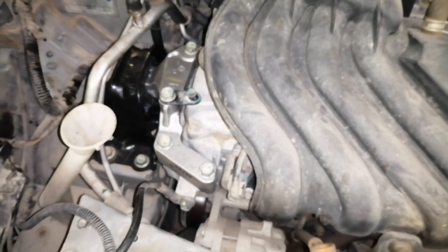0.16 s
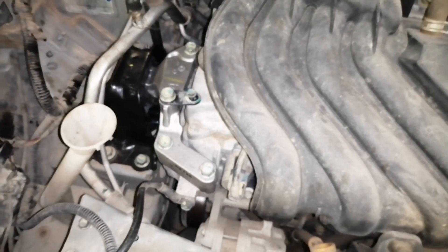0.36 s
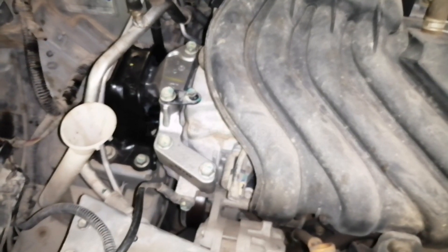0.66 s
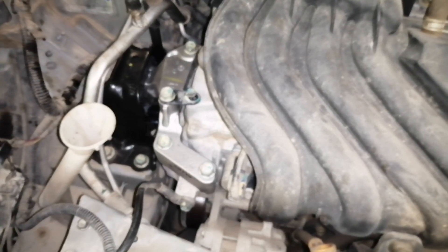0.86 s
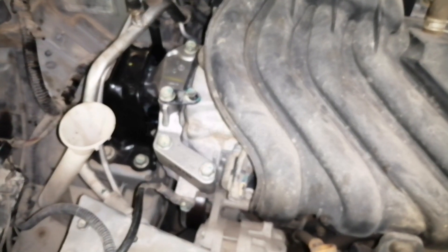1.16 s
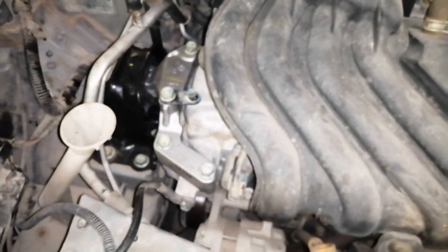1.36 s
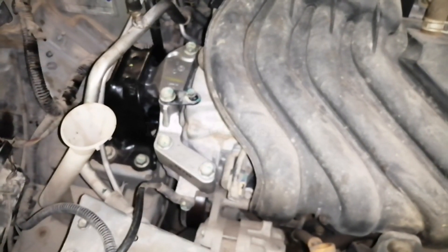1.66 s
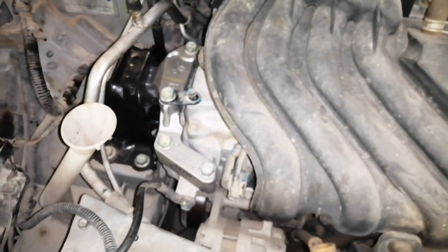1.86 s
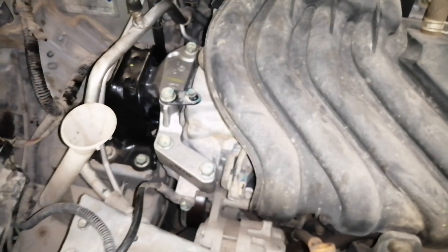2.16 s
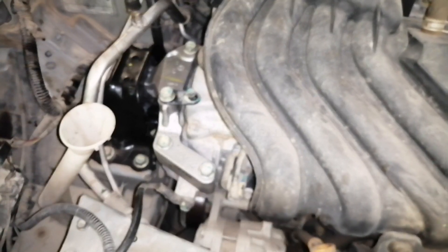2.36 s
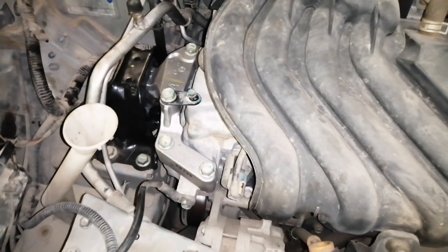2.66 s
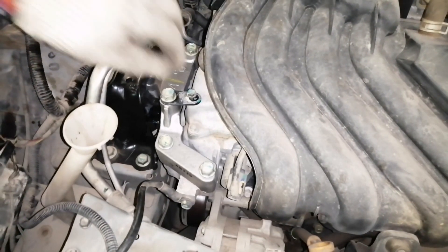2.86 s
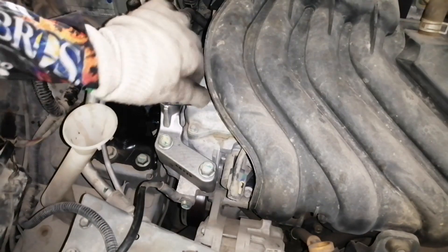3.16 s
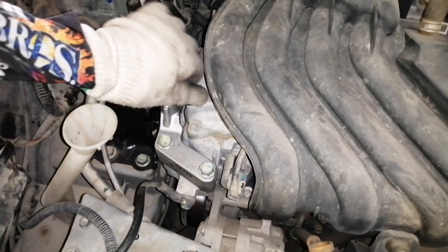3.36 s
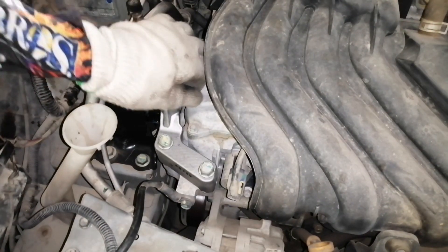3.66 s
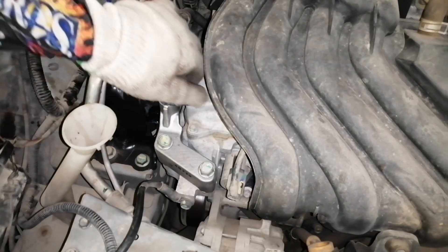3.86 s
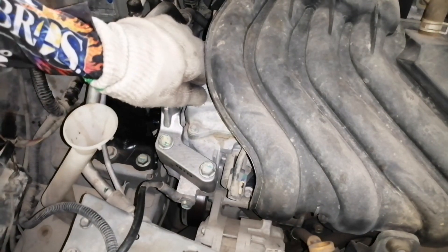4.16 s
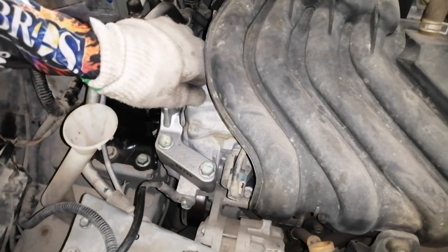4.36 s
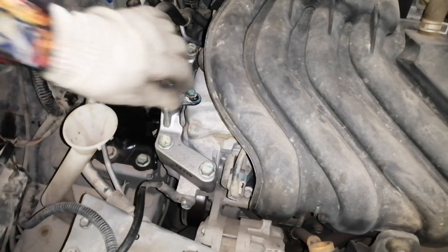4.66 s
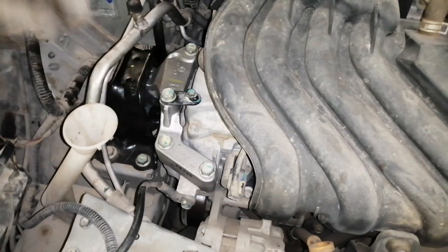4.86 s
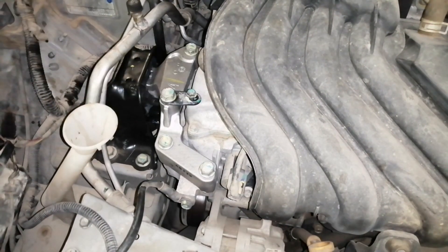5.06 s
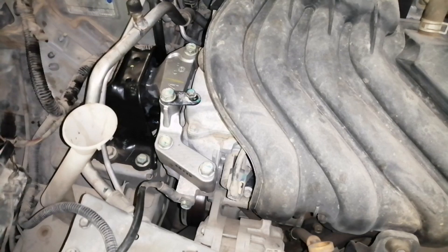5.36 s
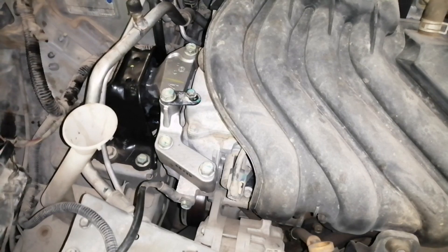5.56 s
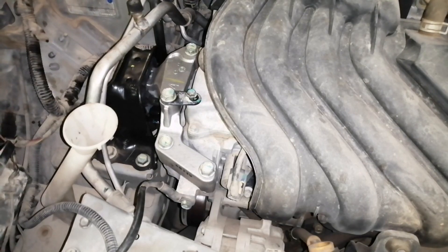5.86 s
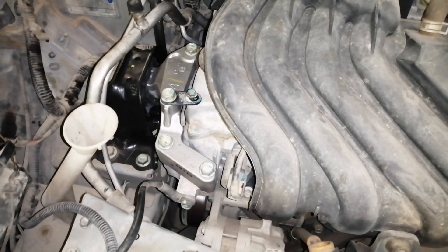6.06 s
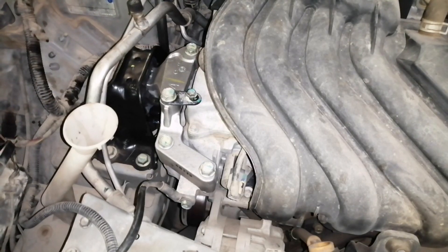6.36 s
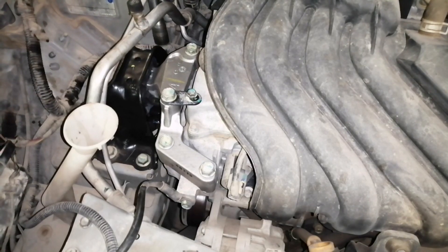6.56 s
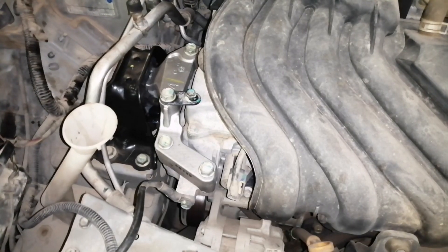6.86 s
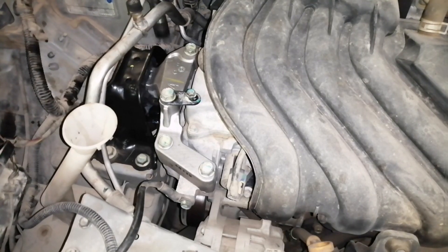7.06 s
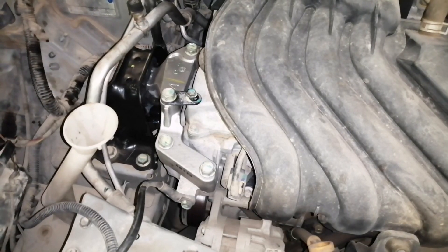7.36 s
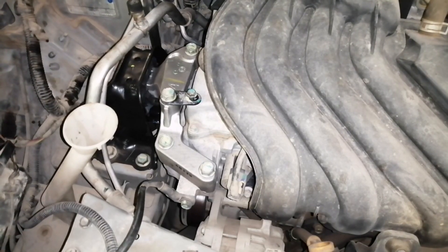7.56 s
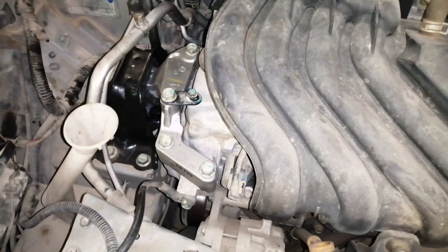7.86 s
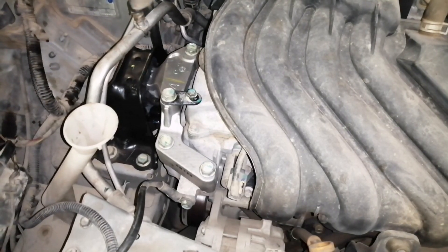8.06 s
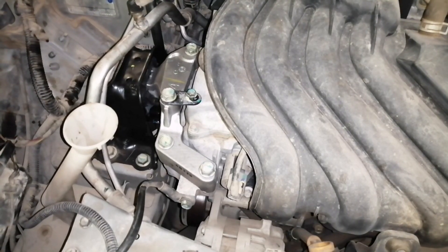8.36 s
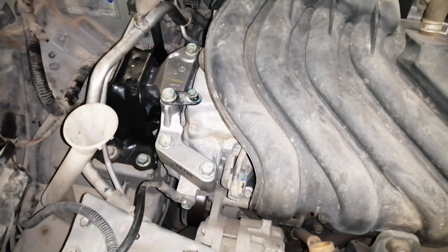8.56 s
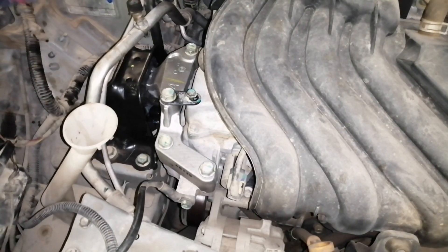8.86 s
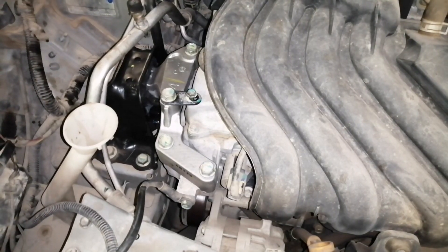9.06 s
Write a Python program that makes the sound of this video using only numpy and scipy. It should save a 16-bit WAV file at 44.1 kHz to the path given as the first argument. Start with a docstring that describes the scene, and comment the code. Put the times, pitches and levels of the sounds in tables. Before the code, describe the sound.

Two quick rattling bursts of a pneumatic ratchet on a bolt, fading hiss of leaking air, then sparse metallic clinks and soft thuds in a workshop.

```python
"""An engine bay in a humming workshop, taken on a two-port microphone: an air ratchet rattles on a bolt.
Two short bursts mix motor hiss, vane pulses and blows that ring engine parts; exhaust buffets the ports.
Then a thin air leak is heard as wavering noise bands, while tools knock and clink as scrapes through resonances.
Soft thuds, light taps and the after-rings of blows and knocks are decaying tones; rumble, a wavering hum
and a dull echo tail lie behind."""
import sys
import numpy as np
from scipy import signal
from scipy.fft import rfft, irfft, next_fast_len
from scipy.io import wavfile

SR = 44100
rng = np.random.default_rng(int(sys.argv[2]) if len(sys.argv) > 2 else 0)


def bounce(signal):
    """Save signal as a 16-bit WAV file at the path given by the first command-line argument."""
    frames = np.transpose(np.atleast_2d(signal))
    limited = np.clip(frames, -1, 1)
    pcm = np.round(limited * 32767).astype(np.int16)
    wavfile.write(sys.argv[1], SR, pcm)


N = 405719
FFT_SIZE = next_fast_len(N)
HZ = np.maximum(np.fft.rfftfreq(FFT_SIZE, 1 / SR), 1)


def from_db(db):
    """Level in dB to amplitude."""
    return 10 ** (np.asarray(db) / 20)


def rms_one(x):
    """Scale to an rms of 1."""
    return x / np.sqrt(np.mean(x ** 2) + 1e-20)


def in_time(rows, outside=None):
    """Draw each column after the time as a line over the whole scene."""
    s, *columns = np.transpose(rows)
    return [np.interp(np.arange(N) / SR, s, c, left=outside, right=outside) for c in columns]


def at_hz(points):
    """Draw (frequency, value) points as a line over log frequency."""
    hz, value = np.array(points).T
    return np.interp(np.log(HZ), np.log(hz), value)


def drift(rate_hz):
    """Slow chance: noise at every 8th sample through a double one-pole low-pass; spread 1."""
    r = np.exp(-16 * np.pi * rate_hz / SR)
    settling = 5000   # samples dropped while the filter settles
    noise = rng.standard_normal(N // 8 + settling + 2)
    slow = signal.lfilter([1], [1, -2 * r, r * r], noise)[settling:]
    return np.interp(np.arange(N) / 8, np.arange(len(slow)), rms_one(slow))


def band(x, low_hz, high_hz):
    """Band-pass with gentle edges."""
    return signal.sosfilt(signal.butter(2, [low_hz, high_hz], "band", fs=SR, output="sos"), x)


def resonate(x, hz, width_hz):
    """One resonance, gain about 1 on top."""
    r = np.exp(-np.pi * width_hz / SR)
    feedback = [1, -2 * r * np.cos(2 * np.pi * hz / SR), r * r]
    return signal.lfilter([(1 - r * r) / 2, 0, (r * r - 1) / 2], feedback, x)


# likeness of the two microphone ports: (frequency [Hz], share of the left noise in the right [0..1])
PORT_LIKENESS = [(60, 0.9), (300, 0.9), (900, 0.7), (2500, 0.08), (15000, 0.083)]


def stereo_noise(spectrum, lag_s, pan_db, least_alike=0):
    """Coloured noise on two spaced ports: the right hears it later and only partly alike; rms 1 before panning."""
    left, other = rfft(rng.standard_normal((2, FFT_SIZE)))
    alike = np.clip(np.maximum(at_hz(PORT_LIKENESS), least_alike), 0, 1)
    delayed = left * np.exp(-2j * np.pi * HZ * lag_s)
    right = alike * delayed + np.sqrt(1 - alike ** 2) * other
    pair = irfft(np.array([left, right]) * from_db(at_hz(spectrum)), FFT_SIZE)[:, :N]
    return rms_one(pair) * from_db([[pan_db / 2], [-pan_db / 2]])


def burst(s, t60, rise_s):
    """First sample of a short sound and its envelope: a rise, then a steepening fall of 60 dB at t60."""
    at = round(s * SR)
    t = np.arange(min(round(.3 * SR), N - at)) / SR
    return at, (1 - np.exp(-t / rise_s)) * from_db(-60 * (t / t60) ** 1.483)


def notes(events, cycles, pan_db, least_s=0):
    """Each row rings one mode that loses 60 dB over the given cycles, or over least_s if longer."""
    out = np.zeros(N)
    for s, level_db, hz in events:
        at, shape = burst(s, max(cycles / hz, least_s), max(.0013, 0.39 / hz))
        ring = np.sin(2 * np.pi * hz * np.arange(len(shape)) / SR)
        out[at:at + len(shape)] -= from_db(level_db) * shape * ring
    return out * from_db([[pan_db / 2], [-pan_db / 2]])


def held(start, end, rise_db_per_s, fall_db_per_s):
    """Level in dB: 0 from start to end, on straight slopes before and after."""
    t = np.arange(N) / SR
    return np.minimum(0, np.minimum(rise_db_per_s * (t - start), fall_db_per_s * (end - t)))


# trigger pulls: (full speed from [s], let go at [s], base level of air and gears [dB])
TRIGGER_PULLS = [(-.1, 0.177, -22.5), (0.404, 1.083, -23.5)]
RISE_DB_PER_S, STOP_DB_PER_S = 480, 750   # the valve opens and shuts


def pulled(fall_db_per_s, lag_s=0):
    """Level in dB of a layer that comes with each trigger pull and dies at its own pace."""
    pulls = [db + held(start + lag_s, end, RISE_DB_PER_S, fall_db_per_s) for start, end, db in TRIGGER_PULLS]
    return np.max(pulls, axis=0)


COAST_DB, COAST_DB_PER_S = -21, 18   # the vanes run down after the valve shuts


def motor_level():
    """Level in dB of the air motor: valve noise, and under it the slower coasting of the vanes."""
    return np.maximum(pulled(STOP_DB_PER_S), COAST_DB + pulled(COAST_DB_PER_S))


# colour of the motor hiss: (frequency [Hz], relative spectrum level [dB])
MOTOR_SPECTRUM = [(59, -31), (100, -28), (524, -10.5), (1250, -7), (1680, -8.5), (3620, -7), (7290, -2),
                  (10700, -11), (15000, -8)]
RATTLE_DB, RATTLE_DB_PER_S = -16, 46   # low rattle relative to the pull's level, and how it dies
RATTLE_LAG_S = 0.031   # the gears take up load after the air is heard


def motor(level_db):
    """Vane motor air hisses; the gears add a low rattle that comes later and dies more slowly."""
    hiss = from_db(level_db + 2.5 * drift(150)) * stereo_noise(MOTOR_SPECTRUM, 0.000241, -1.0, least_alike=0.29)
    rattle_db = RATTLE_DB + pulled(RATTLE_DB_PER_S, RATTLE_LAG_S)
    rattle_spectrum = [(80, -11.5), (200, 1.0), (600, -5.0), (1300, -35), (2500, -26.5)]
    rattle = from_db(rattle_db + 2.7 * drift(82)) * stereo_noise(rattle_spectrum, .0001, 1.0)
    return hiss + rattle


# ratchet blows, and two faint clicks of exhaust slaps (.879, 1.075):
# (time [s], base crack level [dB], base body drive [dB], rise constant [s])
BLOWS_AND_CLICKS = [(0.0587, -15, -22, 0.0032), (0.143, -16.5, -14.5, 0.0045), (.2315, -24, -20, 0.00054),
                    (0.462, -15, -14.5, 0.0027), (0.5255, -16.5, -17, 0.0013), (.594, -14.5, -14, 0.0017),
                    (0.6638, -13.5, -24, 0.00044), (0.727, -15, -16, 0.0004), (0.7894, -16.5, -17.5, .0004),
                    (0.853, -15, -16.5, .0004), (.879, -27, -38, 0.00037), (0.917, -14, -22.5, 0.0022),
                    (0.977, -14, -16.5, 0.00039), (1.0362, -18.5, -17.5, 0.0011), (1.075, -26, -43, .0004),
                    (1.1364, -25, -19, 0.0006), (1.195, -28, -23, 0.0026)]
# colour of the cracks: (frequency [Hz], relative spectrum level [dB])
CRACK_SPECTRUM = [(100, -8), (524, -2), (891, 4), (970, -8), (1310, -4), (1720, 2.5), (3620, -12.5),
                  (5300, 3), (15000, -16)]
# engine parts rung by the ratchet: (frequency [Hz], width [Hz], relative level [dB])
ENGINE_PARTS = [(204, 66, -8.5), (531, 56, -1), (957, 37, -2.5), (1126, 52, -7.5), (1636, 200, -6),
                (2344, 20, -1), (2673, 67, -2.5)]
REBOUND_S, REBOUND_DB = 0.0145, -8.5   # one weaker repeat follows each row, as a pawl bounces; mean delay
HARD_BLOW_DB, DULLING = -18.5, 0.34   # softer rows lose this many dB per octave for each dB
BLOW_T60_S, SNAP_RISE_S = 0.049, 0.00055   # rows that rise more slowly than this snap less
RIGHT_LAG = np.array([0, 11])   # the right port hears the snaps later [samples]


def blows_and_clicks(motor_db):
    """Each blow or click is a snap and a burst of chatter, with one repeat, that rings the engine parts."""
    crack = np.zeros(N)
    # the running motor also shakes the parts faintly
    drives = np.outer(np.ones(len(ENGINE_PARTS)), .15 * from_db(motor_db))
    octaves = np.log2(np.array(ENGINE_PARTS)[:, 0] / ENGINE_PARTS[1][0])
    chatter = from_db(0.98 * drift(310)) * stereo_noise([(20, 0), (20000, 0)], 0.00018, -2.5)
    snaps = np.zeros((2, N))
    for s, crack_db, body_db, rise_s in BLOWS_AND_CLICKS:
        at, shape = burst(s, BLOW_T60_S, rise_s)
        span = slice(at, at + len(shape))
        bounce_s = REBOUND_S * rng.uniform(.8, 1.2)
        shape = shape + from_db(REBOUND_DB) * np.roll(shape, round(bounce_s * SR))
        sharp_front = .8 + 1.2 * burst(s, 0.011, 0.0003)[1]
        crack[span] += from_db(crack_db) * shape * sharp_front
        # no two rows excite the parts alike
        part_db = rng.normal(0, 2.5, len(ENGINE_PARTS)) + DULLING * min(0, crack_db - HARD_BLOW_DB) * octaves
        drives[:, span] += np.outer(from_db(body_db + part_db), shape)
        # the snap comes just after the start
        snaps[[0, 1], round((s + .0012) * SR) + RIGHT_LAG] -= from_db(crack_db + 3.0) * min(1, SNAP_RISE_S / rise_s)
        chatter[[0, 1], round((s + .003) * SR) + RIGHT_LAG] += 14.0
    running = round(1.6 * SR)   # the parts ring only in this opening stretch
    rung = np.zeros((2, N))
    for (hz, width_hz, db), drive in zip(ENGINE_PARTS, drives):
        ring = resonate((drive * chatter)[:, :running], hz, width_hz)
        rung[:, :running] += from_db(db + 14 + 3.15 * drift(28)[:running]) * ring
    cracks = crack * from_db(2.9 * drift(270)) * stereo_noise(CRACK_SPECTRUM, 0.00029, -2.2, least_alike=0.38)
    return cracks + rung + band(snaps, 1300, 8000)


def ratchet():
    """Air motor and gears follow the trigger pulls; blows and clicks ring the engine parts."""
    level_db = motor_level()
    return motor(level_db) + blows_and_clicks(level_db)


# the vane motor growls early on: (time [s], vane rate [Hz], base level [dB])
VANE_GROWL = [(0, 221.2, -33.5), (.058, 296, -30), (.074, 264, -34), (.082, 250, -53)]


def spin_up():
    """Vane pulses: four uneven harmonics in step, a sharp pull each, that follow the vane rate."""
    hz, level_db = in_time(VANE_GROWL)
    turns = 2 * np.pi * np.cumsum(hz) / SR
    sounding = np.arange(N) < VANE_GROWL[-1][0] * SR
    pulses = sum(from_db(1.2 * drift(40)) * np.cos(k * turns) / k ** 0.1 for k in range(1, 5))
    return -from_db(level_db) * sounding * pulses


# exhaust stream on the microphone, mean of both ports: (time [s], level [dB])
EXHAUST_STREAM = [(0, -46), (.17, -43), (.2, -67), (.37, -64), (.6, -33), (.8, -29), (1.05, -33),
                  (1.11, -66)]
# single slaps of exhaust air on the left port: (time [s], level before its decay [dB])
EXHAUST_SLAPS = [(.06, -13.5), (0.73, -13), (.817, -18), (0.858, -7), (.997, -6), (1.022, -10),
                 (1.077, -10)]
SLAP_S, SLAP_RIGHT_DB = 0.0044, -37   # half a swing; right port relative to the left


def buffeting():
    """Exhaust air hits the ports: lumpy low noise, and single slaps that push the membrane in and out."""
    lumps = np.array([from_db(4.8 * drift(34)) * band(rng.standard_normal(N), 25, 345) for port in range(2)])
    out = rms_one(lumps) * from_db(in_time(EXHAUST_STREAM, -120)[0] + [[4.5], [-4.5]])
    t = np.arange(round(5 * SLAP_S * SR)) / SR / SLAP_S   # in half swings
    slap = -np.sin(np.pi * t) * np.exp(-1.5 * t)
    for s, level_db in EXHAUST_SLAPS:
        at = round(s * SR)
        out[:, at:at + len(t)] += from_db(level_db + np.array([[0], [SLAP_RIGHT_DB]])) * slap
    return out


# air flow through the leak: (time [s], base level of the main band [dB])
LEAK_FLOW = [(.17, -50), (.22, -38), (1.68, -36), (1.78, -41), (1.92, -45), (2.45, -46), (2.66, -56),
             (4.4, -57), (4.8, -51.5), (4.87, -47), (5.0, -47.5), (5.1, -43), (5.33, -42), (5.42, -50.5),
             (9.2, -50.5)]
# the jet's low whistling band: (time [s], base level [dB])
LEAK_WHISTLE = [(.17, -45.5), (1.25, -42), (1.5, -47), (2.38, -58.5), (2.52, -55.5), (3.0, -60),
                (4.4, -60.5), (4.84, -53), (4.93, -43), (5.06, -42.5), (5.13, -56)]
# colour of the jet under its resonances: (frequency [Hz], relative spectrum level [dB])
LEAK_SPECTRUM = [(1060, -36), (1800, -8), (3950, -7), (4970, -2), (6650, 0.5), (8060, -3.5), (10900, -5.5),
                 (14900, -5)]
# nozzle resonances: (frequency [Hz], width [Hz], mean added level [dB])
NOZZLE_RESONANCES = [(2930, 1540, 5), (5270, 500, -3.5), (6950, 850, -4), (9920, 1150, -0.5),
                     (15370, 2900, 1.5)]
TOP_DB, TOP_FOLLOWS = -49.5, 1.16   # thin top at a flow of -49.5 dB; it swings more than the flow
PUFF_FROM_S, PUFF_TO_S, PUFF_EDGE_DB_PER_S = 3.026, 3.11, 413   # a jolt lets one puff out; how it fades
PUFF_DB, PUFF_WHISTLE_DB, PUFF_TOP_DB, PUFF_THIN_DB = -41, -46, -40, -46   # the puff in each band


def leak():
    """A thin jet: nozzle resonances waver, the top follows the flow, a lower whistling band swells on its own."""
    puff_db = held(PUFF_FROM_S, PUFF_TO_S, 700, PUFF_EDGE_DB_PER_S)
    flow_db, = in_time(LEAK_FLOW)
    main_db = np.maximum(flow_db, PUFF_DB + puff_db)
    top_db = np.maximum(TOP_DB + TOP_FOLLOWS * (flow_db + 49.5), PUFF_THIN_DB + puff_db)
    whistle_db = np.maximum(in_time(LEAK_WHISTLE)[0], PUFF_WHISTLE_DB + puff_db)
    air = stereo_noise(LEAK_SPECTRUM, 0.00043, -0.98)
    jet = air + sum(from_db(db + 1.8 * drift(2.56)) * resonate(air, hz, width_hz)
                    for hz, width_hz, db in NOZZLE_RESONANCES)
    parts = ((whistle_db, 2000, 3700), (main_db, 4200, 7900), (top_db, 8000, 17000),
             (PUFF_TOP_DB + puff_db, 7900, 11200))
    out = np.zeros((2, N))
    for db, low_hz, high_hz in parts:
        layer = band(band(jet, low_hz, high_hz), low_hz, high_hz)
        out += from_db(db + 1.32 * drift(15)) * rms_one(layer)
    return out


# tools on metal: (time [s], scrape level [dB], ring of the struck part [Hz], ring level [dB],
# pitch where the tool rings most [Hz], tool level [dB], t60 of the contact [s]); levels are base values
TOOL_KNOCKS = [(3.0089, -37, 500, -16, 2460, -35, 0.036), (3.013, -39, 967, -21, 2550, -18.5, 0.059),
               (3.087, -34, 488, -27, 2710, -27, 0.042), (3.0925, -49, 905, -49, 4700, -14, 0.046),
               (5.447, -45, 503, -43, 1700, -43, 0.04), (5.466, -34.5, 476, -64, 3100, -28.5, 0.11),
               (5.831, -42.5, 490, -45, 2600, -46.5, 0.055), (6.041, -36.5, 785, -49, 2340, -23.5, 0.04),
               (6.066, -59, 990, -37, 1810, -27, 0.055), (6.397, -47, 710, -41, 5500, -35, 0.084),
               (6.461, -58, 900, -57, 5300, -30, 0.058), (6.541, -42, 800, -49, 5840, -18.5, 0.065),
               (6.83, -41.5, 787, -36, 6300, -26, 0.12), (7.777, -36, 896, -33.5, 5160, -18, 0.083),
               (7.833, -53, 496, -34.5, 1700, -47, 0.052), (7.86, -35, 487, -57, 4970, -31, 0.048),
               (7.884, -46, 920, -38, 4750, -29, 0.066), (8.112, -40, 854, -38, 5850, -22.5, 0.11),
               (8.134, -50, 515, -36, 4960, -16.5, 0.054), (8.142, -43, 1630, -35, 5360, -28, 0.069),
               (8.17, -55, 899, -28.5, 1600, -39, 0.079), (8.778, -39, 3000, -37, 3200, -24.5, 0.092),
               (8.878, -46, 933, -30, 2100, -41, 0.068), (8.941, -51, 483, -49, 1660, -30, 0.089)]
# hand tool modes: (frequency [Hz], width [Hz], mean relative level [dB])
TOOL_MODES = [(1645, 40, -12), (2630, 140, -17), (3700, 300, -17.5), (4900, 110, -4), (5160, 99, -6),
              (6100, 90, -4)]
KNOCK_RISE_S = 0.0034   # rise of a contact with a t60 of .1 s, far slower in longer ones
TICK_RISE_S = 0.0021   # contacts that rise more slowly than this tick less
TOOL_DB_PER_OCTAVE = 3.5   # modes further from the struck spot's pitch ring less


def knocks():
    """Each contact is a short scrape of noise: it rings the struck part and the tool's own modes."""
    out = np.zeros((2, N))
    scrape_spectrum = [(150, 4.5), (700, 1.5), (8000, -15.5), (16000, -41)]
    grit = from_db(2.14 * drift(490)) * stereo_noise(scrape_spectrum, 0.00036, -6.0, least_alike=0.2)
    for s, scrape_db, part_hz, part_db, spot_hz, tool_db, t60 in TOOL_KNOCKS:
        rise_s = KNOCK_RISE_S * (10 * t60) ** 2.3
        at, shape = burst(s, t60, rise_s)
        span = slice(at, at + len(shape))
        scrape = shape * grit[:, span]
        scrape[[0, 1], [4, 20]] += 7.8 * min(1, TICK_RISE_S / rise_s)   # the first touch is a hard tick
        # the right port hears the part's tone later
        radians_per_hz = (np.arange(len(shape)) / SR - [[0], [.0004]]) * 2 * np.pi
        part = 0.84 * shape * np.sin(part_hz * radians_per_hz) + resonate(scrape, part_hz, 310)
        tool = 0.84 * resonate(scrape, spot_hz, 370)
        # each contact excites the modes differently
        for (hz, width_hz, db), own_db in zip(TOOL_MODES, rng.normal(0, 1.6, len(TOOL_MODES))):
            mode_db = db + own_db - TOOL_DB_PER_OCTAVE * abs(np.log2(hz / spot_hz))
            tool = tool + from_db(mode_db) * resonate(scrape, hz, width_hz)
        out[:, span] += from_db(scrape_db) * scrape + from_db(part_db) * part + from_db(tool_db) * tool
    return out


# soft thuds, and low rings after a blow or knock: (time [s], level before envelope and pan [dB], ring [Hz])
DULL_RINGS = [(.234, -19, 520), (3.009, -20, 274), (3.012, -28, 127), (3.027, -29, 820), (3.038, -29, 560),
              (3.116, -29.5, 695), (3.216, -30, 487), (5.487, -25, 375), (5.496, -32, 373),
              (5.829, -35, 265), (6.846, -36, 355), (7.85, -31, 414), (7.869, -24, 339), (7.888, -34, 397),
              (8.177, -28, 524), (8.806, -20.5, 300), (8.821, -25, 343), (8.904, -19.5, 260),
              (8.918, -21, 166), (8.939, -19, 322), (8.958, -23.5, 182), (8.969, -23.5, 370),
              (8.989, -20.5, 166), (9.012, -17.5, 325), (9.067, -28.5, 336), (9.111, -28.5, 270)]


def dull_rings():
    """Dull short rings, a little to the right: soft thuds, and low rings after a blow or knock."""
    return notes(DULL_RINGS, cycles=8.6, pan_db=-7.5)


# light taps, and long clear rings of struck tools, one mode per row:
# (time [s], level before envelope, roughness and pan [dB], ring [Hz])
CLEAR_RINGS = [(2.09, -52, 766), (2.208, -50, 770), (2.64, -38, 2890), (2.663, -46, 2950),
               (6.412, -49.5, 920), (6.79, -44, 764), (7.235, -44, 760), (7.779, -40, 2770),
               (8.779, -36, 6940), (8.78, -40, 5560)]


def clear_rings():
    """Light taps, and long clear rings of struck tools, one mode per row; grit roughens the ring."""
    return from_db(2.0 * drift(120)) * notes(CLEAR_RINGS, cycles=104, pan_db=-8.5, least_s=0.083)


# workshop rumble colour: (frequency [Hz], relative spectrum level [dB])
RUMBLE_SPECTRUM = [(20, -2), (53, 1), (180, -5), (205, -10), (408, -9), (926, -17.5), (1160, -19),
                   (1650, -18.5), (4000, -36), (8800, -120)]
# workshop rumble: (time [s], base level [dB])
RUMBLE_LEVEL = [(0, -59), (1.4, -59), (1.9, -53), (2.3, -47), (4.5, -49), (9.2, -48.5)]
# hum of a distant machine: (time [s], base level [dB])
HUM_LEVEL = [(0, -81), (1.5, -57), (2.9, -51), (3.5, -70), (4.7, -52.5), (5.5, -92), (9.2, -61)]
HUM_HZ = 178   # mean pitch


def workshop():
    """Uneven low rumble and one hum of a distant machine, wavering in pitch and level."""
    hum_phase = 2 * np.pi * np.cumsum(HUM_HZ + 1.765 * drift(3.9)) / SR
    hum = from_db(in_time(HUM_LEVEL)[0] + 2.0 * drift(0.58)) * np.sin(hum_phase)
    rumble_db = in_time(RUMBLE_LEVEL)[0] + 0.63 * drift(2.1)
    return from_db(rumble_db) * stereo_noise(RUMBLE_SPECTRUM, 0.00028, -4.5) + hum


ROOM_T60_S, ROOM_DB, ROOM_CUT_HZ = 0.48, -14, 1220


def room(x):
    """A dull tail of dense echoes, partly alike in the two channels."""
    t = np.arange(SR) / SR
    left, right, both = rng.standard_normal((3, SR))
    echoes = band([left + 4.7 * both, right + 0.88 * both], 83, ROOM_CUT_HZ)
    tail = echoes * from_db(-60 * t / ROOM_T60_S) * (t > .01)
    tail = from_db(ROOM_DB) * tail / np.sqrt(np.sum(tail ** 2, axis=1, keepdims=True))
    return signal.fftconvolve(x.mean(axis=0, keepdims=True), tail, axes=1)[:, :N]


def scene():
    """The ratchet, knocks and dull rings with their echoes, clear rings, air on the microphone, the workshop."""
    tool = ratchet() + spin_up()
    handling = knocks() + dull_rings()
    echoes = room(tool + 0.83 * handling)
    return tool + handling + clear_rings() + echoes + buffeting() + leak() + workshop()


CUTOFF_HZ = 16200   # stopband edge, 70 dB down


def record(dry):
    """Peaks are rounded, the top is cut."""
    rounded = .8 * np.tanh(dry / .8)
    return signal.sosfilt(signal.cheby2(16, 70, CUTOFF_HZ, fs=SR, output="sos"), rounded)


dry = scene()
out = record(dry)
bounce(out)
```